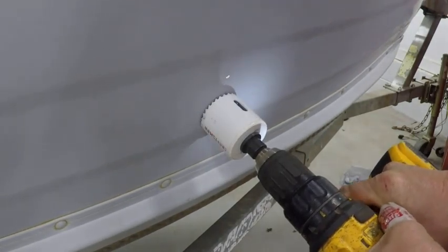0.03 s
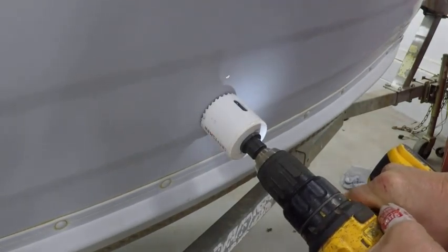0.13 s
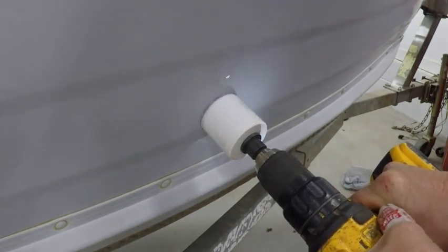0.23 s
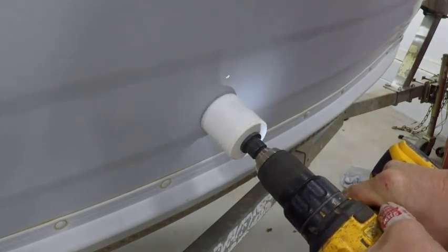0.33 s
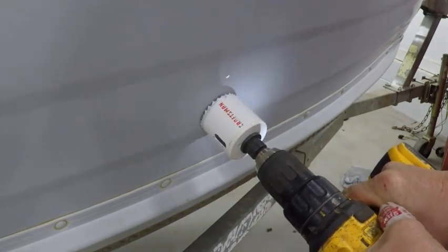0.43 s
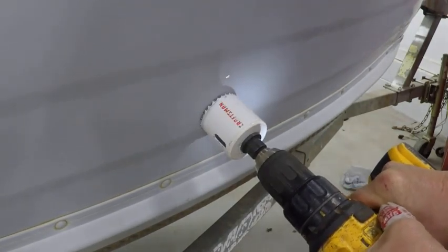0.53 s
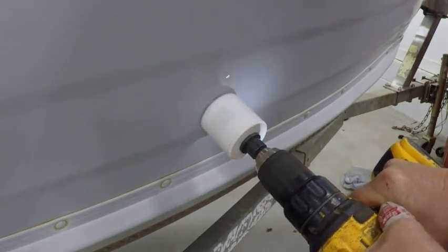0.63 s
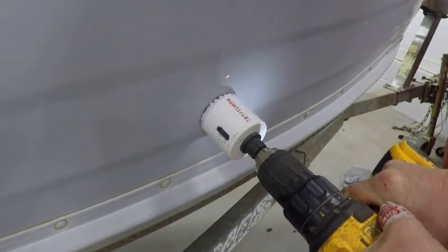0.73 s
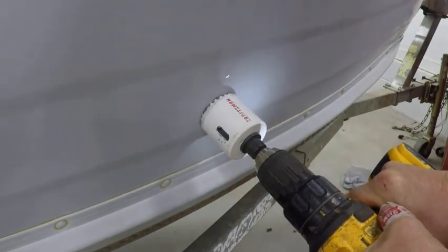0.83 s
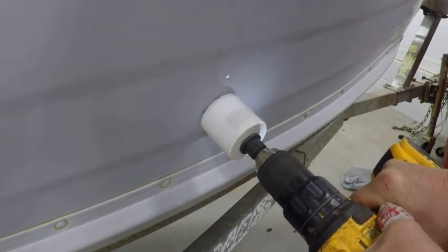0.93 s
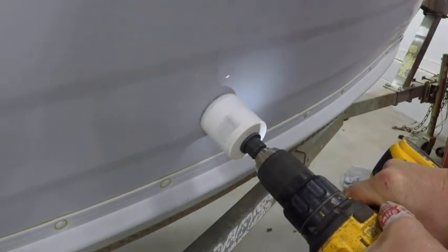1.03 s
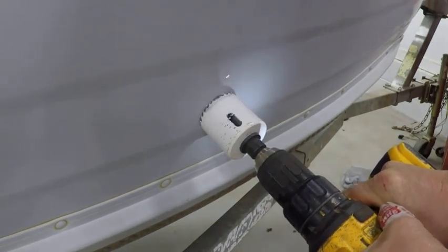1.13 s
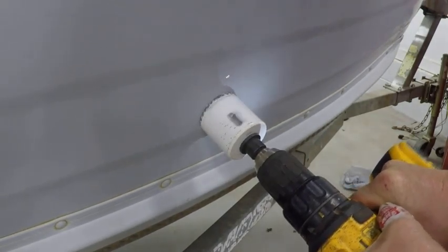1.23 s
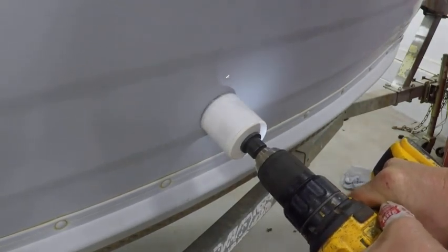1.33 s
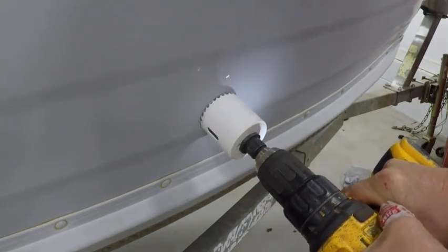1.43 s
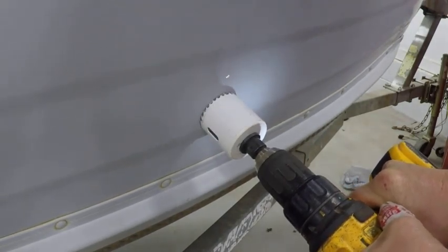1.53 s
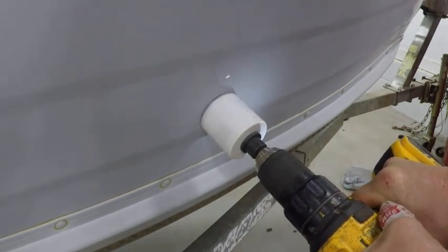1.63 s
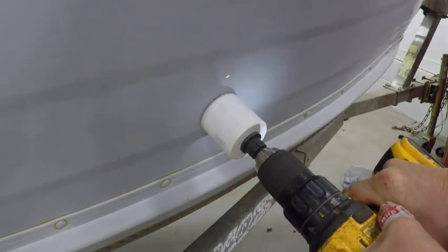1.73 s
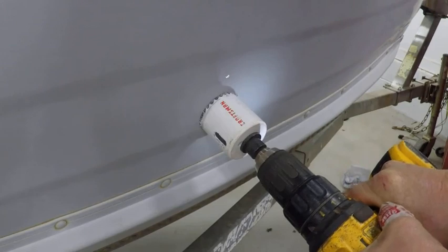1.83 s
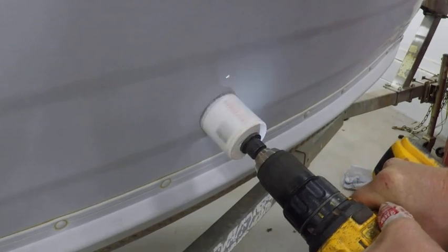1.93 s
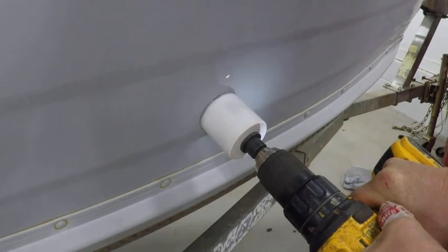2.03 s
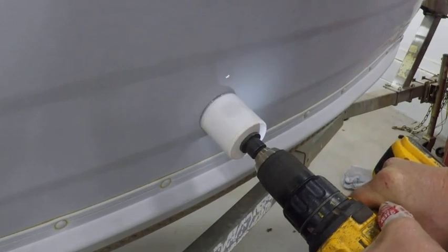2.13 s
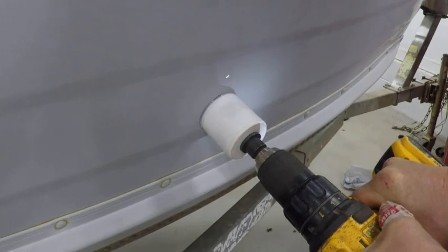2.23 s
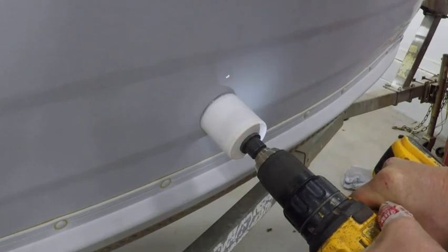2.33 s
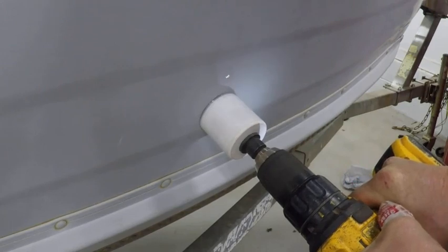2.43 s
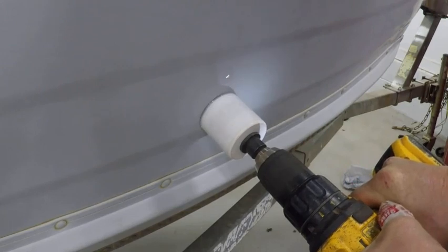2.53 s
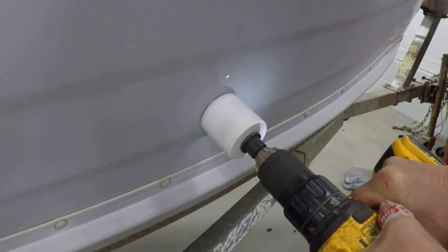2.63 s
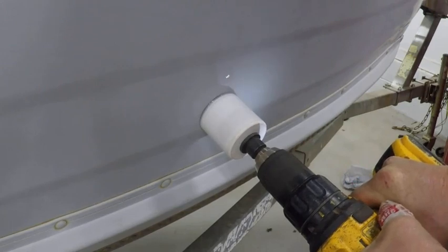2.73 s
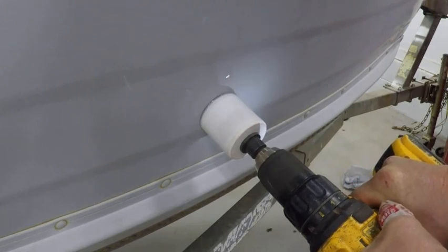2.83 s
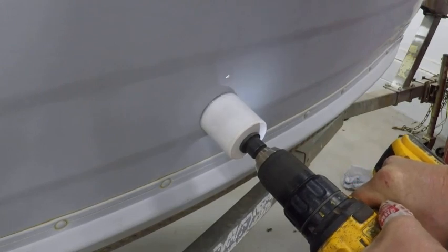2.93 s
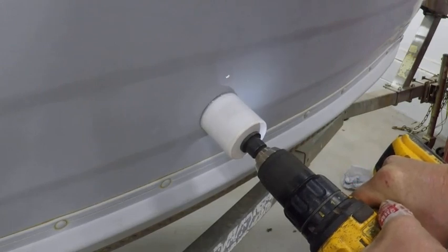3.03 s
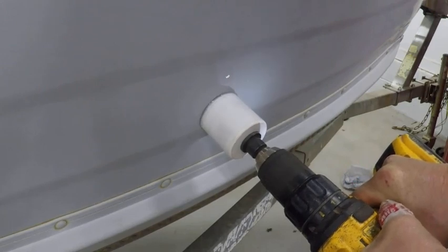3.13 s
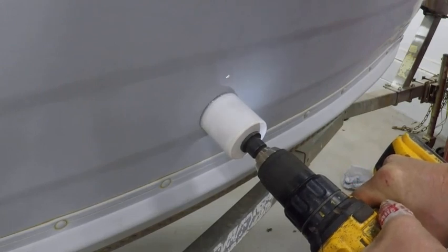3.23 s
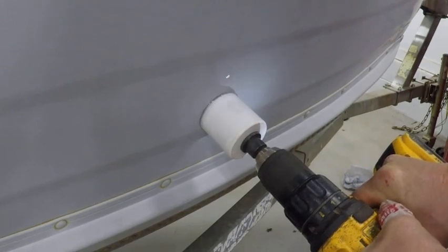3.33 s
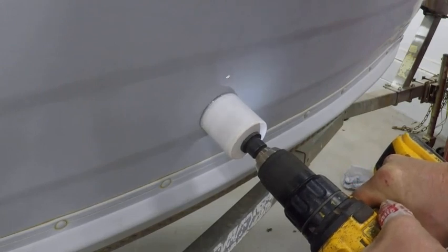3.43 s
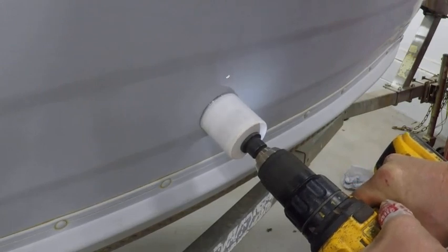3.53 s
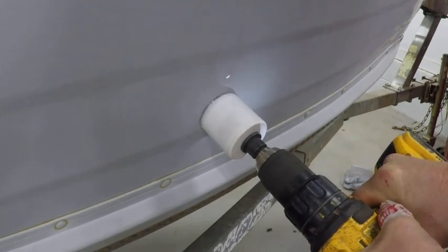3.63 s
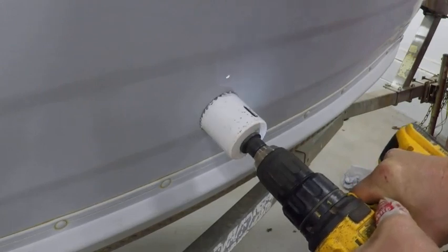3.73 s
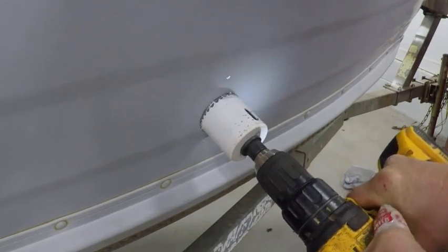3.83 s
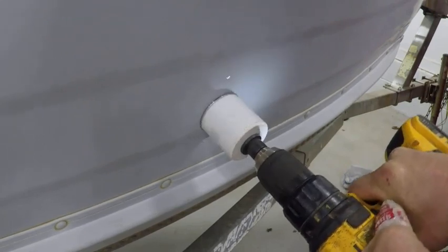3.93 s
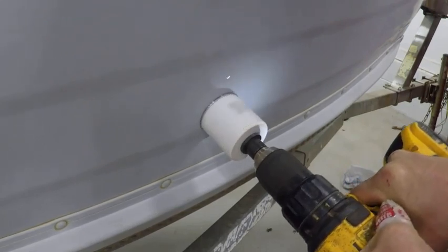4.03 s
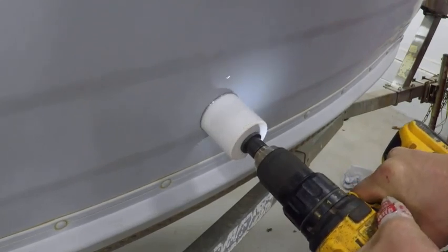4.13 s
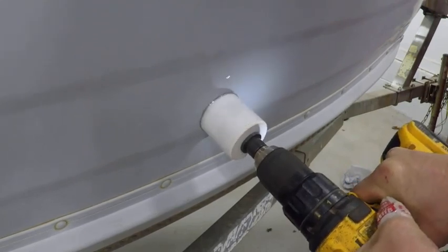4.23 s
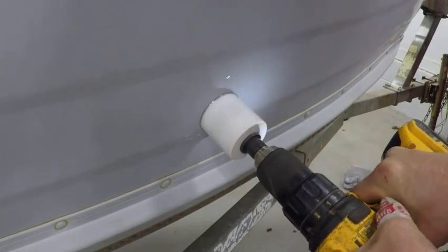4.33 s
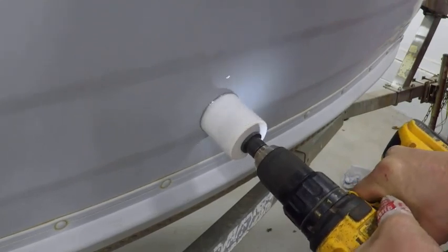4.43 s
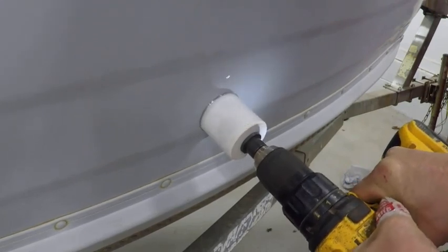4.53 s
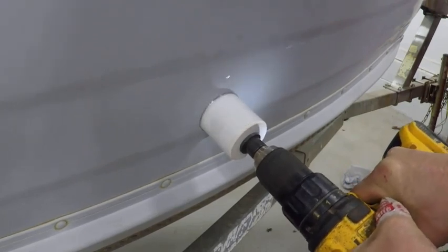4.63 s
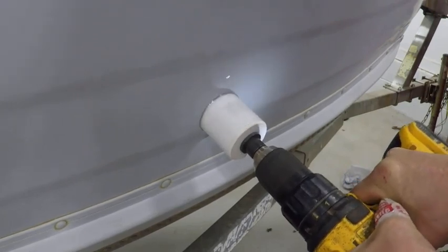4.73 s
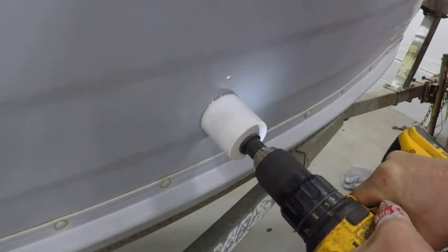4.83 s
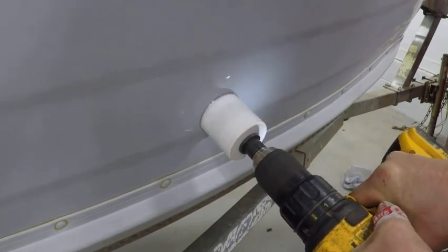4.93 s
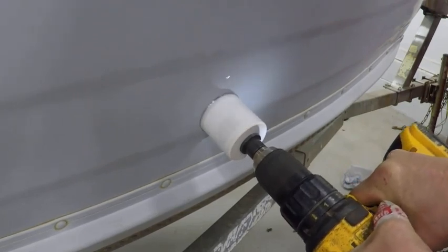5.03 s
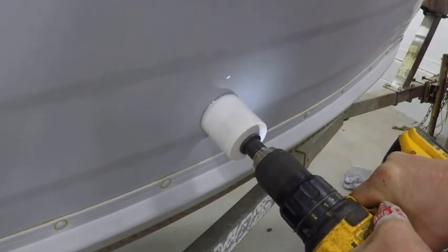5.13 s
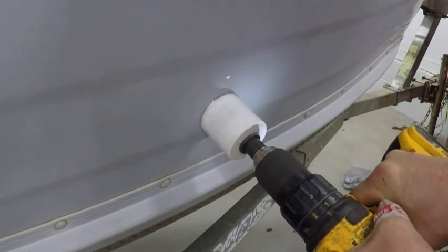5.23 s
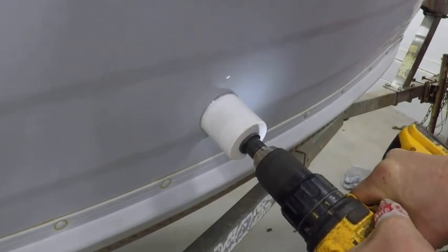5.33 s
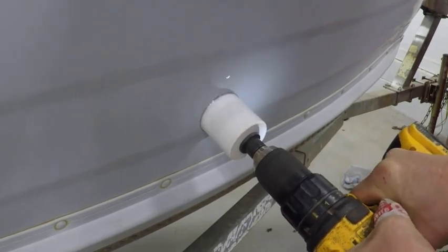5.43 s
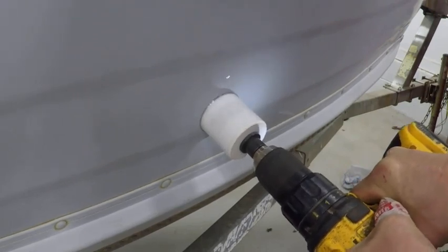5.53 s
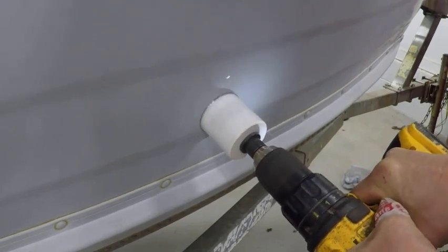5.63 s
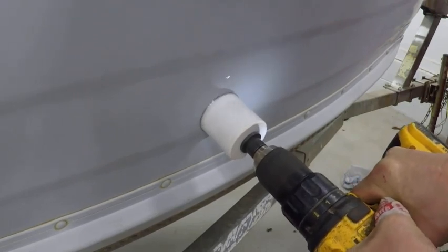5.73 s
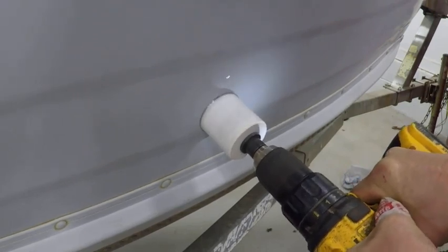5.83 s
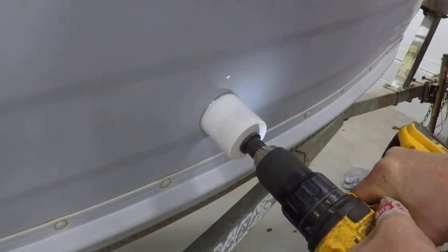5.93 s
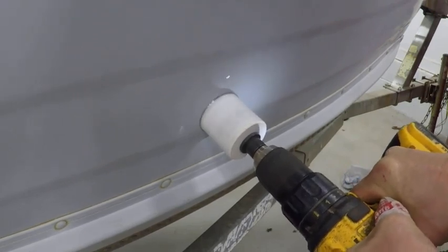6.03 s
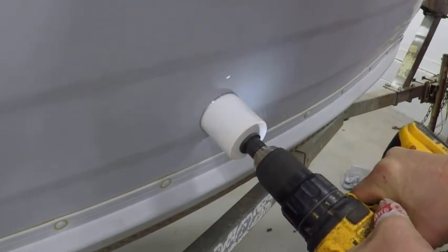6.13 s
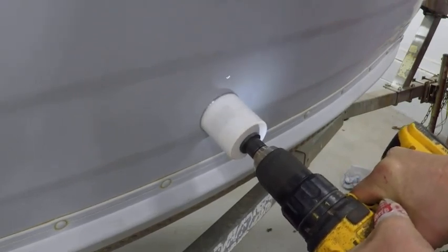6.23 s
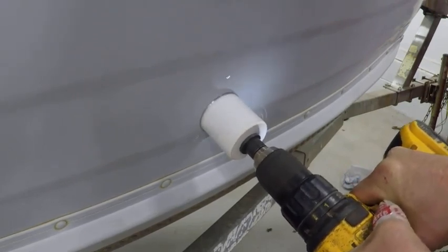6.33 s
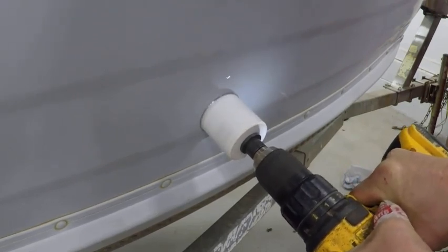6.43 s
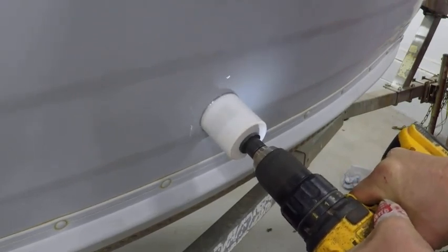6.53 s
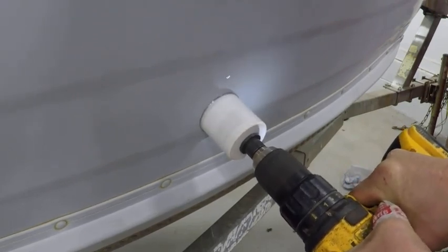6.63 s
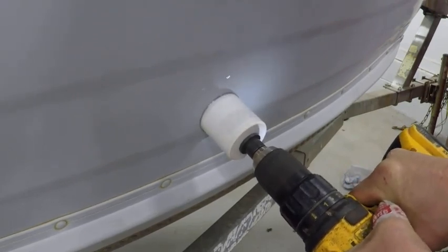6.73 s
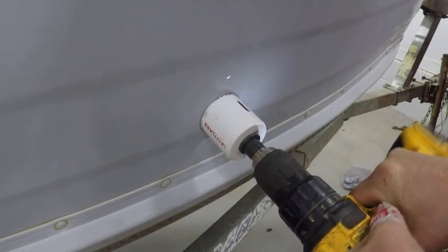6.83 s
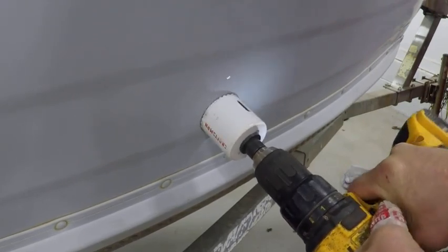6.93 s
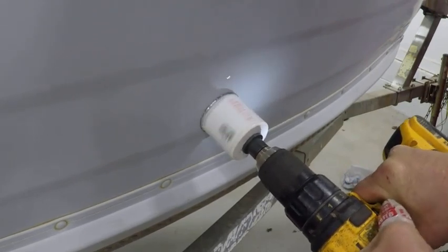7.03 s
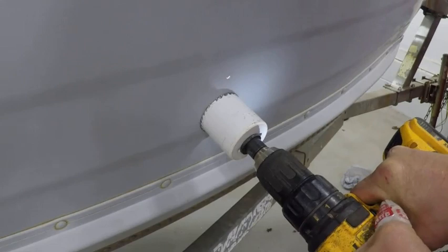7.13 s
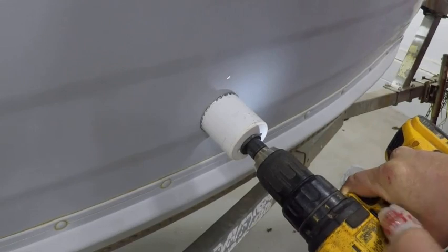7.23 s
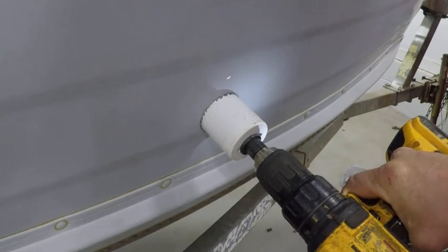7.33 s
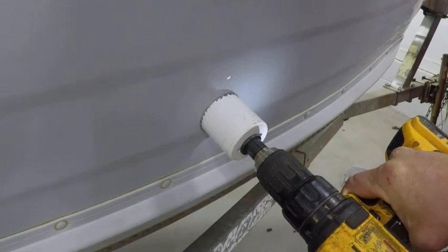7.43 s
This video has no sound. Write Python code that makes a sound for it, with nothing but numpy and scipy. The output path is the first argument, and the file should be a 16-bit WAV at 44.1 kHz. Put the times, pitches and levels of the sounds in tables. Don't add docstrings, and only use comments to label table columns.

```python
import sys
import numpy as np
from scipy import signal
from scipy.fft import rfft, irfft, next_fast_len
from scipy.io import wavfile
from scipy.ndimage import uniform_filter1d

SR = 44100
rng = np.random.default_rng(int(sys.argv[2]) if len(sys.argv) > 2 else 0)


def level_to_linear(level):
    exponent = np.asarray(level, float) / 20
    return 10 ** exponent


def put_to_file(sound):
    columns = np.atleast_2d(sound).T
    safe = np.clip(columns, -1, 1)
    whole_steps = np.round(safe * 32767)
    wavfile.write(sys.argv[1], SR, whole_steps.astype(np.int16))


N = 329868
TIME = np.arange(N) / SR
SLOW = 1 / 3
TRUE_SPEED_S = 2.807


def unit(x):
    return x / np.sqrt(np.mean(x ** 2))


def colour(x, spectrum):
    hz, db = np.transpose(spectrum)
    bins = np.fft.rfftfreq(4096, 1 / SR)
    log_gain = np.interp(np.log(bins + 1), np.log(hz), db) * np.log(10) / 20
    cepstrum = irfft(log_gain)
    cepstrum[1:2048] *= 2
    cepstrum[2049:] = 0
    return signal.fftconvolve(x, irfft(np.exp(rfft(cepstrum))))[:N]


def ring(modes, pace=1, sign=-1):
    t = TIME[:SR // 2] * pace
    out = 0
    for k, (hz, width, db) in enumerate(modes):
        decay = np.exp(-np.pi * width * t)
        out = out + level_to_linear(db) * width * decay * np.sin(2 * np.pi * hz * t) * sign ** k
    return out


def strike(x, answer):
    return signal.fftconvolve(x, answer)[:N]


def taps(events):
    out = np.zeros(N)
    for s, db in events:
        out[int(s * SR)] = level_to_linear(db)
    return out


def walk(rate):
    hold = int(SR / rate)
    steps = np.repeat(rng.standard_normal(N // hold + 1), hold)
    return 1.2 * uniform_filter1d(steps, hold)[:N]


def patchy(x, rate, depth_db):
    size = next_fast_len(N)
    spectrum, hz = rfft(x, size), np.fft.rfftfreq(size, 1 / SR)
    out = 0
    for centre in np.arange(0, 18000, 2000):
        part = np.clip(1 - abs(hz - centre) / 2000, 0, 1)
        out = out + irfft(spectrum * part, size)[:N] * level_to_linear(depth_db * walk(rate))
    return out


def bites(rate, spread_db):
    hardness = level_to_linear(spread_db * np.minimum(rng.exponential(size=N), 4)) - 1
    hard = (rng.random(N) < rate / SR) * hardness
    return unit(rng.standard_normal(N) * (1 + uniform_filter1d(hard, size=40) * 40))


# (time [s], feed [dB])
HAND_FEED = [(2.11, 2.5), (2.2, -0.5), (2.8, -0.5), (2.82, -2), (3.2, -5.5), (3.43, 1.5), (3.61, -6.5),
             (3.68, 8), (4.12, 1), (4.27, 0.5), (4.42, -4), (4.7, 1), (5.15, -5.5), (5.7, 2.5), (6.1, 2.5),
             (6.55, -2), (6.64, -5), (6.85, 3.5)]


def work(pulls, spin, layers):
    pull, release, strength = np.transpose(pulls)[:, :, None]
    spin_up_s, coast_s = spin
    rise = 1 - np.exp(-np.maximum(TIME - pull, 0) / spin_up_s)
    fall = np.exp(-np.maximum(TIME - release, 0) / coast_s)
    feed = np.interp(TIME, *np.transpose(HAND_FEED))
    levels = []
    for db, loss, push, lean, haste in layers:
        drive = rise * fall ** haste * (loss + push * strength + lean * feed)
        levels.append(db + np.max(drive, axis=0) - loss)
    return levels


# (time [s], length [s], level over the steady cut [dB])
GRAB_EVENTS = [(3.353, 0.016, 1), (3.631, 0.013, 0), (4.085, 0.051, 5), (4.302, 0.017, 7),
               (4.662, 0.024, 6.5), (4.692, 0.021, 9.5), (4.778, 0.014, 4.5), (4.818, 0.012, 6),
               (4.847, .018, 6.5), (5.048, .01, 8.5), (5.287, 0.024, 5.5), (5.356, 0.011, 3.5),
               (5.718, .03, 5), (5.909, 0.02, 7), (6.108, 0.0099, 7), (6.154, 0.018, 8.5),
               (6.206, 0.013, 7), (6.285, 0.021, 8.5), (6.343, 0.025, 10), (6.398, 0.015, -1),
               (6.475, 0.017, 8.5), (6.508, 0.024, 9.5), (6.549, 0.029, 9.5), (6.662, 0.017, 5.5),
               (6.845, 0.032, 2), (7.083, 0.043, 7.5), (7.13, 0.029, 4)]


def grabs():
    force = 1
    for s, length, db in GRAB_EVENTS:
        onset = (TIME - s) / 0.0024
        let_go = 2 - 2 * (TIME - s) / length / 0.93
        force = force + (level_to_linear(db) - 1) * np.clip(np.minimum(onset, let_go), 0, 1)
    return force


# (frequency [Hz], width [Hz], level [dB])
HULL_MODES = [(220.8, 12.7, 0), (373.5, 21.4, 1), (416, 39, -21), (518, 19, -29), (599, 28, -11),
              (642, 13, -17), (705.4, 29, -1), (807, 32, -8), (842.5, 7, -4), (902.5, 29, -6.5),
              (1135, 530, -22.5), (1290, 24, -10)]
# (time [s], level [dB])
DRILL_TILT = [(2.8, 2.5), (2.85, -1), (4.1, -3.5), (4.2, 3.5), (4.55, 2.5), (4.7, -3), (5.35, 2),
              (5.5, 9.5), (5.62, -12), (6.2, -2.5), (6.32, 0), (6.45, -7.5), (6.8, 1), (7.05, 5.5),
              (7.13, -3.5)]


def hull_plate(shake, rattle, force, pace, driven, thud, thud_db, low_hz):
    deep = strike(shake / force ** 0.3, ring(HULL_MODES[:2], pace))
    upper = strike(shake, ring(HULL_MODES[2:], pace))
    lowest = strike(shake / force ** 0.6, ring(HULL_MODES[:1], pace))
    deep = deep + lowest * (level_to_linear(np.interp(TIME, *np.transpose(DRILL_TILT))) - 1)
    hull = (deep + driven * upper) / np.std(deep + upper)
    hull = hull + level_to_linear(thud_db) * driven * unit(colour(rattle, thud))
    return signal.sosfilt(signal.butter(2, low_hz, "high", fs=SR, output="sos"), hull)


# (frequency [Hz], width [Hz], level [dB])
CUP_MODES = [(1600, 19, 1.5), (2730, 69, -11.5), (3170, 42, 1), (3636, 39, 2.5), (4280, 94, -2.5)]


def saw_teeth(rattle, flutter, force, pace, grind, cup_db):
    teeth = unit(colour(bites(600 * pace, 0.83) * flutter * force ** 0.71, grind))
    return teeth + level_to_linear(cup_db) * unit(strike(rattle, ring(CUP_MODES, pace)))


def flying_chips(flutter, force, pace, hiss):
    return unit(colour(bites(500 * pace, 2.1) * flutter * force ** 0.12, hiss))


def cutting(levels, pace, thud, grind, hiss, force, thud_db, cup_db, free_db, low_hz, top_hz):
    hull_db, grind_db, hiss_db = levels
    flutter = level_to_linear(0.8 * walk(40 * pace))
    shake = bites(500 * pace, 2.3) * flutter * force
    rattle = bites(500 * pace, 2.3) * flutter * force
    driven = level_to_linear(0.61 * np.minimum(grind_db - hull_db - free_db, 0))
    hull = hull_plate(shake, rattle, force, pace, driven, thud, thud_db, low_hz)
    teeth = saw_teeth(rattle, flutter, force, pace, grind, cup_db)
    chips = flying_chips(flutter, force, pace, hiss)
    bright = patchy(teeth * level_to_linear(grind_db + 1) + chips * level_to_linear(hiss_db + 5), 30, depth_db=1.5)
    lift_db = -9 * np.clip((TIME - 7.28) / 0.015, 0, 1)
    heard = hull * level_to_linear(hull_db - 2 + lift_db) + bright
    return signal.sosfilt(signal.ellip(10, 0.5, 60, top_hz, fs=SR, output="sos"), heard)


# (frequency [Hz], density [dB per Hz])
SLOW_THUD_COLOUR = [(12, -29), (20, -6), (151, -10.5), (231, -1.5), (600, -20), (780, -17.5), (1320, -120)]
SLOW_GRIND_COLOUR = [(260, -30), (450, -5.5), (928, 0.5), (1210, 2), (1740, -2.5), (2100, -1), (3240, -3),
                     (4900, -3), (7000, -12), (9100, -31), (15400, -120)]
SLOW_HISS_COLOUR = [(3820, -13), (6500, -3.5), (7490, -3), (12300, -10.5), (15500, -16)]
# (pull [s], release [s], strength [dB])
SLOW_TRIGGER = [
    (-.06, .06, -1.5),
    (.285, .42, -2),
    (.635, .765, -1),
    (.98, 1.12, -2),
    (1.315, 1.465, -2),
    (1.635, 1.815, -2),
    (1.995, 2.85, -0.5),
]
# (spin-up [s], coast [s])
SLOW_MOTOR = (0.019, 0.084)
# (level at full speed [dB], loss at rest [dB], share of strength, share of feed, haste of the fall)
SLOW_LEVELS = [
    (-19, 16, 1.25, 0.36, 0.27),
    (-20, 33.5, 1.4, 1.04, 0.72),
    (-28.5, 36.5, 1.01, 0.16, 1.14),
]


def slow_cut():
    return cutting(work(SLOW_TRIGGER, SLOW_MOTOR, SLOW_LEVELS), SLOW,
                   SLOW_THUD_COLOUR, SLOW_GRIND_COLOUR, SLOW_HISS_COLOUR, force=1,
                   thud_db=2, cup_db=-11.5, free_db=-2, low_hz=29.7, top_hz=15100)


# (frequency [Hz], density [dB per Hz])
THUD_COLOUR = [(20, -25), (100, -40), (160, 0), (250, -10.5), (500, 5.5), (1000, 6.5), (1500, -8.5),
               (2200, -27.5)]
GRIND_COLOUR = [(800, -23.5), (1400, -4), (2600, -4.5), (3600, -4), (4400, -4.5), (5000, -11.5), (5700, -8),
                (7000, -11.5), (9000, -15), (15000, -88)]
HISS_COLOUR = [(3820, -36), (6500, -5), (7780, -9.5), (9740, -4), (12100, -0.5), (15100, -6), (15900, -6.5)]
# (pull [s], release [s], strength [dB])
TRIGGER = [
    (2.75, 3.685, 1),
    (3.797, 3.81, -11),
    (3.862, 3.872, -18),
    (3.942, 3.965, 0),
    (4.04, 6.855, 0),
    (6.972, 6.985, -9.5),
    (7.012, 7.025, -0.5),
    (7.07, 7.125, -5.5),
    (7.265, 7.275, -14.5),
    (7.45, 7.46, -13.5),
]
# (spin-up [s], coast [s])
MOTOR = (0.0062, 0.067)
# (level at full speed [dB], loss at rest [dB], share of strength, share of feed, haste of the fall)
TRUE_LEVELS = [
    (-24, 36, 0.96, 0.83, 0.33),
    (-34, 37.4, 1.66, 0.28, 0.81),
    (-38, 44, 1.9, -0.022, 1.4),
]


def true_cut():
    return cutting(work(TRIGGER, MOTOR, TRUE_LEVELS), 0.96,
                   THUD_COLOUR, GRIND_COLOUR, HISS_COLOUR, force=grabs(),
                   thud_db=-4.5, cup_db=-18, free_db=-8, low_hz=99, top_hz=15900)


def squeal(table, pace):
    s, hz, db, octave_db = np.transpose(table)
    wobble = 0.008 * walk(200 * pace) + 0.021 * walk(1200 * pace)
    pitch = uniform_filter1d(np.interp(TIME, s, hz), size=900) * (1 + wobble)
    phase = 2 * np.pi * np.cumsum(pitch) / SR
    fade = np.clip(np.minimum(TIME - s[0], s[-1] - TIME) / 0.008, 0, 1)
    rough = np.sqrt(2) * level_to_linear(2.5 * walk(200 * pace))
    fundamental = level_to_linear(np.interp(TIME, s, db)) * np.sin(phase)
    octave = level_to_linear(np.interp(TIME, s, octave_db)) * np.sin(2 * phase)
    return fade * rough * (fundamental + octave)


def arc(start, end, edge_hz, top_hz, db):
    lift = 1 - np.linspace(-1, 1, 9) ** 2
    hz = edge_hz + (top_hz - edge_hz) * lift
    return np.transpose([np.linspace(start, end, 9), hz, db - 4 * (1 - lift), db - 14 - 8 * (1 - lift)])


# (start [s], end [s], edge pitch [Hz], top pitch [Hz], level [dB])
BURST_ARCS = [(.335, .41, 1800, 2200, -21), (.695, .75, 1750, 2050, -22), (1.04, 1.09, 1800, 2080, -22),
              (1.38, 1.46, 1750, 2180, -22), (1.715, 1.8, 1800, 2250, -20.5),
              (2.075, 2.17, 1800, 2250, -22)]
# (time [s], pitch [Hz], level [dB], octave level [dB])
STEADY_SQUEAL = [(2.23, 1850, -30, -50), (2.265, 2080, -23, -42), (2.32, 2370, -28, -28),
                 (2.42, 2520, -36, -28), (2.5, 2570, -40, -28), (2.65, 2420, -40, -29),
                 (2.75, 2440, -30, -26), (2.805, 2440, -24, -24)]
# (time [s], pitch [Hz])
SQUEAL_PITCH = [
    [(2.85, 6550), (2.91, 6670), (3.17, 6150), (3.215, 5550), (3.44, 6460), (3.526, 5850), (3.626, 5880),
     (3.67, 5350)],
    [(4.07, 6370), (4.106, 8644), (4.184, 8505), (4.39, 6600), (4.478, 6500), (4.57, 5130)],
    [(4.1, 5250), (4.132, 5450), (4.24, 5150)],
    [(4.83, 6060), (4.902, 6550), (4.97, 5850)],
    [(5.09, 5470), (5.15, 6800), (5.195, 7357), (5.246, 6360), (5.3, 5530)],
    [(5.33, 5800), (5.39, 6530), (5.53, 5970), (5.596, 5780), (5.688, 6340), (5.744, 6150), (5.854, 6570),
     (5.92, 6000), (6.04, 6120)],
]
# (level [dB], octave level [dB])
SQUEAL_LEVEL = [(-34, -38), (-38, -58), (-40, -43), (-33, -44), (-36, -42), (-38, -46)]


def motor_squeals():
    slow_tables = [arc(*row) for row in BURST_ARCS] + [STEADY_SQUEAL]
    out = sum(squeal(table, SLOW) for table in slow_tables)
    for pitch, db in zip(SQUEAL_PITCH, SQUEAL_LEVEL):
        out = out + squeal([(*row, *db) for row in pitch], 0.97)
    return out


# (time [s], peak [dB])
CATCH_LEVEL = [(4.8, -30), (5.0, -20), (5.3, -18), (5.45, -14), (5.55, -11), (5.7, -12), (5.9, -15),
               (6.1, -24)]


def catches():
    s, db = np.transpose(CATCH_LEVEL)
    times = 5.617 + np.arange(-26, 16) / 30.7
    late, harder = rng.standard_normal((len(times), 2)).T
    return taps(zip(times + 0.0008 * late, np.interp(times, s, db) + 2 * harder))


# (time [s], peak [dB])
JAM_EVENTS = [
    (3.677, -14),
    (3.868, -34),
    (3.947, -18),
    (6.84, -12.5),
    (6.98, -25),
    (7.0145, -18),
    (7.078, -20),
    (7.122, -19),
]


def jams():
    thump = ring(HULL_MODES, sign=0.94) * np.exp(-TIME[:SR // 2] / 0.099)
    thump /= thump.max()
    t = TIME[:SR // 20]
    grit = colour(rng.standard_normal(N), GRIND_COLOUR)[999:999 + len(t)]
    thump[:len(t)] += 0.36 * np.exp(-t / 0.0068) * grit
    thump = signal.sosfilt(signal.butter(4, 300, "high", fs=SR, output="sos"), thump)
    boom = ring([(hz, 0.54 * width, db) for hz, width, db in HULL_MODES[1:2]])
    stops = taps(JAM_EVENTS)
    return strike(stops + catches(), thump / thump.max()) + strike(stops, 0.84 * boom / boom.max())


# (time [s], peak [dB])
CLICK_EVENTS = [(0.2592, -22), (0.632, -6), (0.9666, -10.5), (1.2994, -13), (1.335, -13.5), (1.6243, -9),
                (1.9787, -9)]
# (frequency [Hz], width [Hz], level [dB])
BODY_MODES = [(1260, 130, -7), (1880, 240, 0), (2300, 250, -5), (3600, 300, -11), (5500, 450, -17),
              (7200, 600, -20)]


def clicks():
    band = signal.butter(2, [850, 4500], "band", fs=SR, output="sos")
    click = signal.sosfilt(band, ring(BODY_MODES))
    return strike(taps(CLICK_EVENTS), click / abs(click).max())


# (time [s], peak [dB], pitch [Hz])
TICK_EVENTS = [(2.4415, -2.5, 6570), (3.7514, -33, 6430), (3.7574, -42, 5900), (3.8008, -33.5, 6020),
               (3.8646, -42, 11800), (4.0465, -28, 8950), (4.0916, -35, 4270), (4.5774, -22, 15500),
               (4.9856, -18, 11900), (5.0709, -19, 11800), (5.3063, -13, 13800), (5.3393, -17, 13300),
               (5.373, -16, 13100), (6.0494, -20, 13100), (6.0894, -23, 12600), (6.233, -15.5, 13300),
               (6.2731, -22, 14600), (6.8303, -14.5, 5780), (6.854, -16.5, 6300), (7.013, -18.5, 4000),
               (7.0906, -27, 11900), (7.2254, -39, 6350), (7.2704, -33, 4200), (7.455, -43.5, 4050)]


def ticks():
    t = TIME[:SR // 20]
    decay = np.exp(-t / 0.0039) + 0.13 * np.exp(-t / 0.015)
    out = np.zeros(N)
    for s, db, hz in TICK_EVENTS:
        edges_hz = np.clip([hz - 1900, hz + 1900], 300, 15800)
        band = signal.butter(2, edges_hz, "band", fs=SR, output="sos")
        burst = signal.sosfilt(band, rng.standard_normal(len(t)) * decay)
        start = int(s * SR)
        out[start:start + len(t)] += (level_to_linear(db) * burst / abs(burst).max())[:N - start]
    return out


def hand_bump():
    swell = np.exp(-((TIME - 7.33 - 0.025) / 0.018) ** 2)
    return level_to_linear(-41) * swell * np.sin(2 * np.pi * 98.7 * TIME)


def tone(hz, start, end, db):
    gate = np.clip(np.minimum(TIME - start, end - TIME) / 0.0022, 0, 1)
    return np.sqrt(2) * level_to_linear(db) * gate * np.sin(2 * np.pi * hz * TIME)


# (start [s], end [s], level [dB])
SLOW_WHISTLES = [(0.253, 0.305, -37), (0.604, 0.664, -42), (0.954, 0.996, -30.5), (1.302, 1.322, -31.5),
                 (1.621, 1.646, -32), (1.973, 2.008, -33.5)]
TRUE_WHISTLES = [
    (3.864, 3.957, -41),
    (6.846, 6.973, -44),
    (7.007, 7.225, -50),
    (7.225, 7.272, -76),
]
LOADED_WHISTLE = (4.07, 6.85, -51)
# (start [s], end [s])
BRAKE_SPAN = (3.69, 3.805)
# (eighths of the whistle, level [dB])
BRAKE_PARTIALS = [(3, -63), (4, -49), (5, -62), (6, -68), (8, -67)]


def controller():
    whistle_hz = 11806
    out = np.zeros(N)
    for row in SLOW_WHISTLES:
        out += tone(whistle_hz * SLOW, *row)
        out += level_to_linear(-26) * tone(2 * whistle_hz * SLOW, *row)
        out += level_to_linear(-25) * tone(whistle_hz, *row)
    for eighths, db in BRAKE_PARTIALS:
        out += tone(whistle_hz * eighths / 8, *BRAKE_SPAN, db)
    for row in TRUE_WHISTLES:
        out += tone(whistle_hz, *row)
    return out + tone(whistle_hz, *LOADED_WHISTLE) * level_to_linear(3 * walk(25))


# (frequency [Hz], density [dB per Hz])
YARD_COLOUR = [(18, -27), (30, -15.5), (86, -5), (199, -15.5), (1320, -38), (1430, -25), (1540, -47),
               (3980, -43), (16000, -67)]


def quiet_yard():
    return level_to_linear(-47.5) * unit(colour(rng.standard_normal(N), YARD_COLOUR))


def scene():
    cut = np.where(TIME < TRUE_SPEED_S, slow_cut(), true_cut())
    knocks = jams() + clicks() + ticks() + hand_bump()
    mono = cut + motor_squeals() + knocks + controller() + quiet_yard()
    return np.array([mono, mono])


def low_pass(x):
    return signal.sosfilt(signal.butter(12, 16460, fs=SR, output="sos"), x)


def record(dry):
    side = 0
    for hz in np.arange(4800, 15500, 800):
        edges = signal.butter(4, [hz - 400, hz + 400], "band", fs=SR, output="sos")
        band = signal.sosfilt(edges, dry[0])
        patch = uniform_filter1d(1.0 * (walk(26) > 0.45 - hz / 20000), 600)
        side = side + patch * np.roll(band, 400)
    side = side * level_to_linear(np.where(TIME < TRUE_SPEED_S, -13, -7))
    return low_pass(dry + np.array([side, -side]))


dry = scene()
out = record(dry)
put_to_file(out)
```